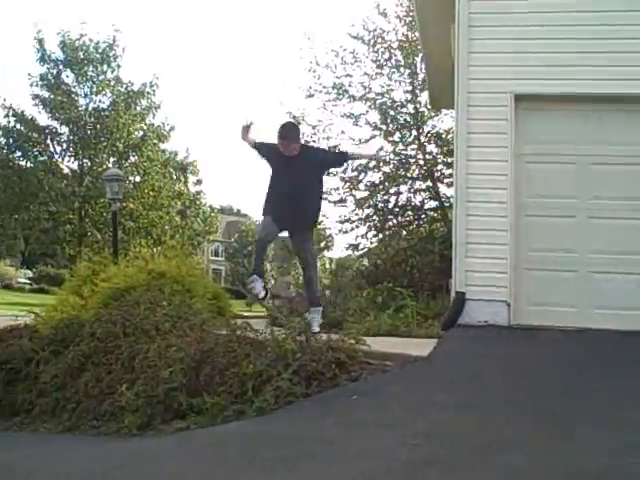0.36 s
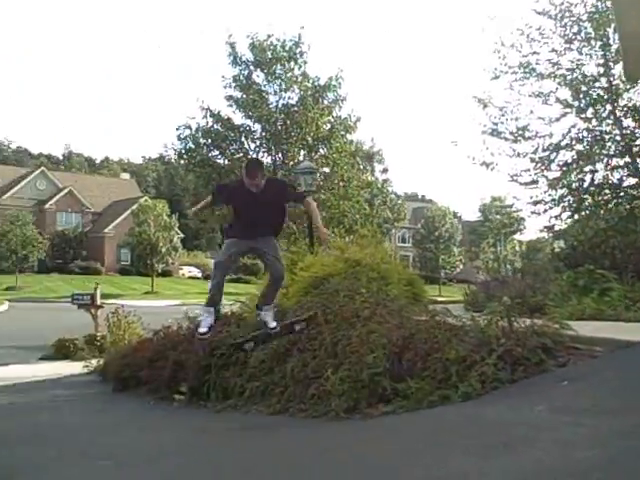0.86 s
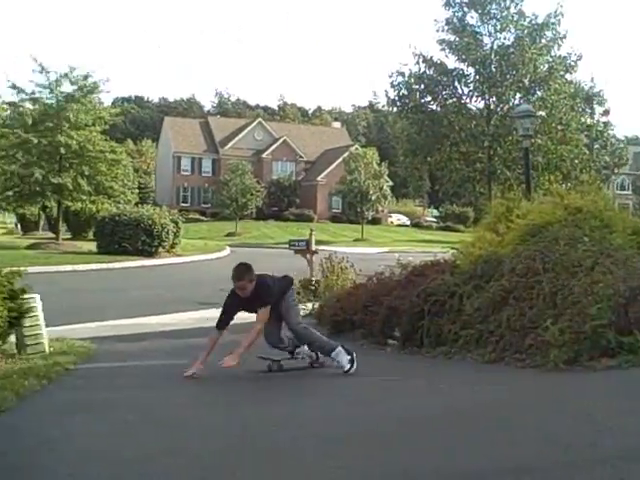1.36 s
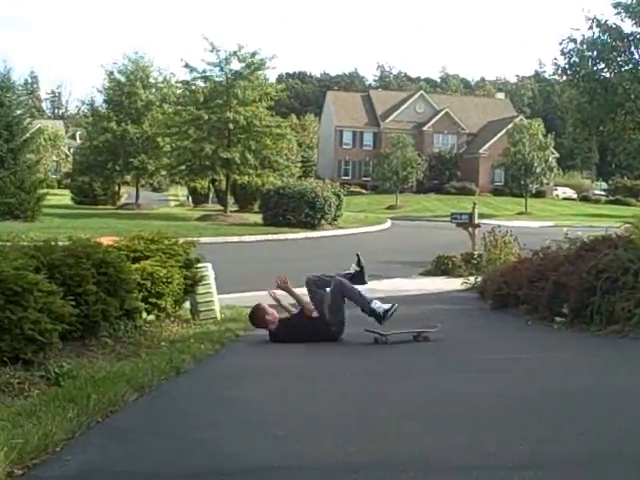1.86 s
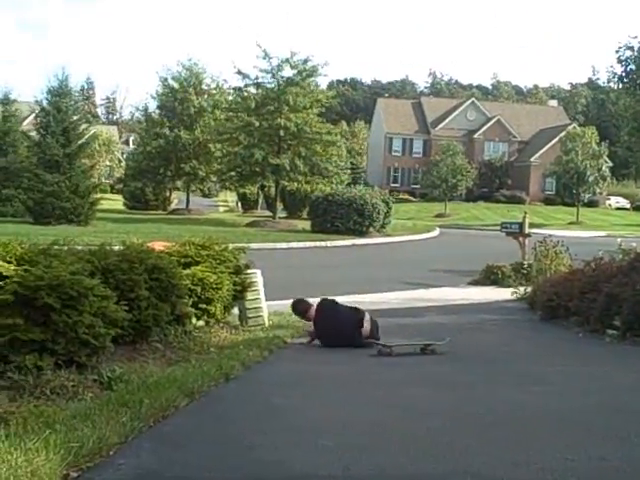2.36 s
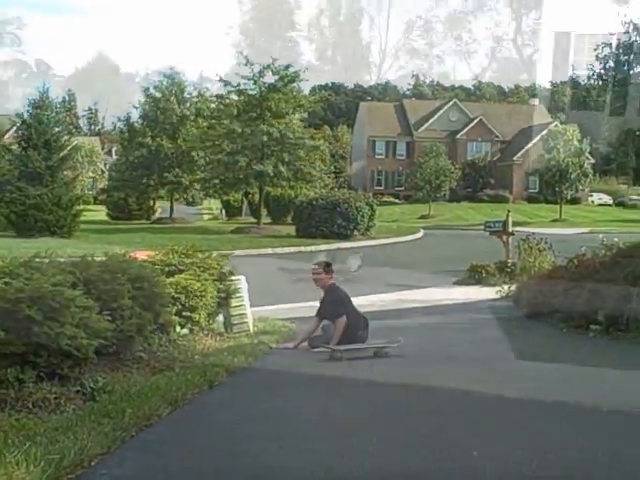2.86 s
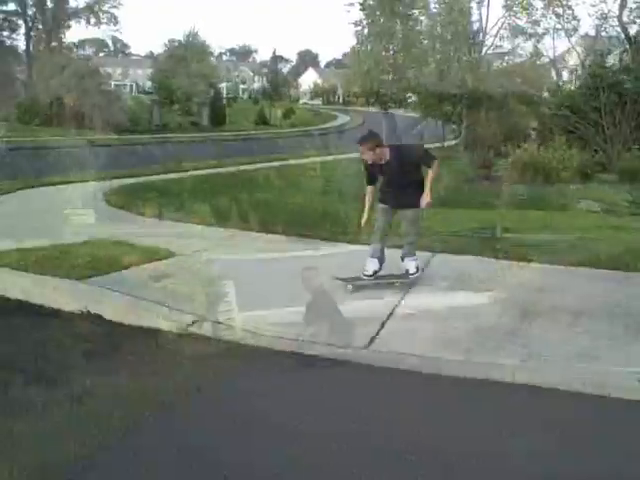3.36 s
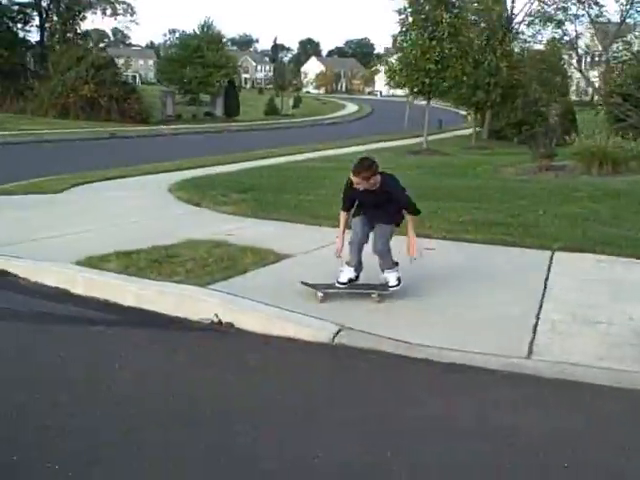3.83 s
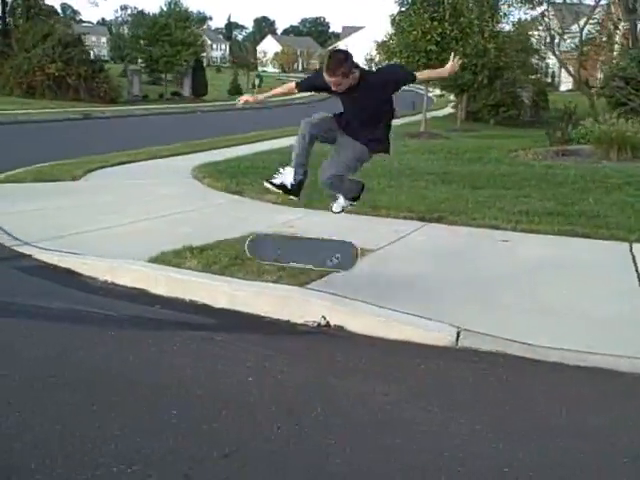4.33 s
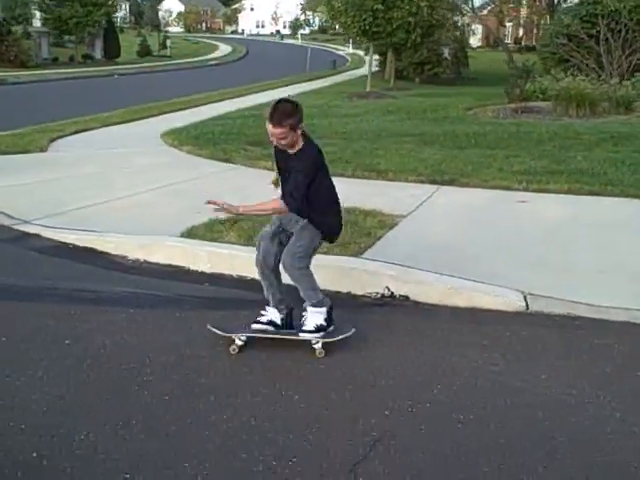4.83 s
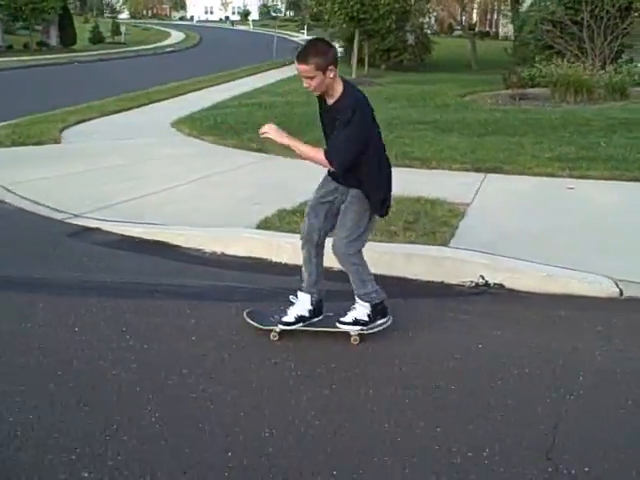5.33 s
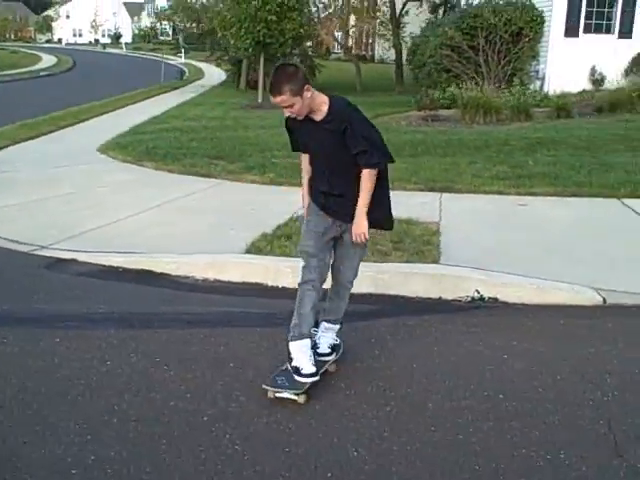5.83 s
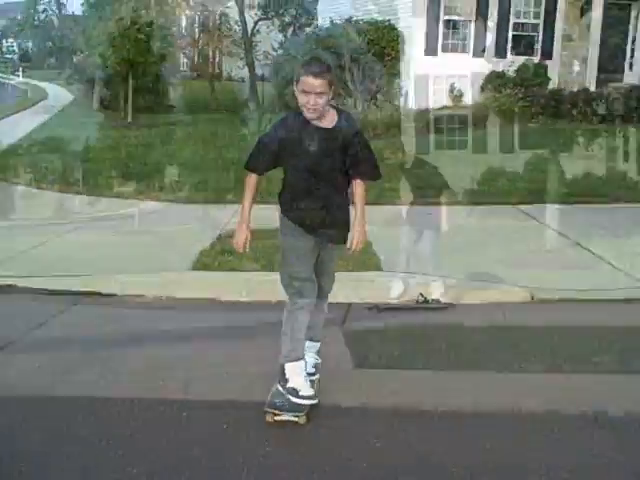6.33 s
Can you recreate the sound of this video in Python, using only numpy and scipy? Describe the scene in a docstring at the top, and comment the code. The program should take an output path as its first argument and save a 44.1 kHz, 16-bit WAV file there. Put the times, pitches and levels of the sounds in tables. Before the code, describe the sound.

A skateboard pops, slams hard onto a driveway and clatters through a tumble, then wind buffets the microphone as it pops and lands again.

```python
"""A skateboard, close by, rolls up, pops, flips and slams onto a driveway; rider and board tumble.
Each blow is a noisy crack, the ringing deck and a scrape; wheels are grit noise, with an echo off house fronts.
Behind it a suburb murmurs (shaped noise) and an engine hums far off (a wavering tone).
The place then dissolves into a windy kerb: gusts of noise buffet the microphone as the board pops, lands, rolls on.
"""
import sys
import numpy as np
from scipy import signal
from scipy.fft import rfft, irfft
from scipy.io import wavfile
from scipy.ndimage import uniform_filter1d

SR = 44100
rng = np.random.default_rng(int(sys.argv[2]) if len(sys.argv) > 2 else 0)


def convert_level_to_amplitude(level_db):
    """Map a level in decibels to its linear amplitude factor."""
    exponent = np.asarray(level_db, float) / 20
    return 10 ** exponent


def transcribe(u):
    """Save the signal u as a 16-bit wav file named by the first command-line argument.

    u: samples, shape (n,) or (channels, n), limited to [-1, 1]; the rate is SR.
    q: integer samples, one column per channel.
    """
    v = np.clip(np.atleast_2d(u).T, -1, 1)
    q = np.round(v * 32767).astype(np.int16)
    wavfile.write(sys.argv[1], SR, q)


N = 283999
TIME = np.arange(N) / SR

# far traffic rumble and hiss, spectrum: (frequency [Hz], density [dB per Hz])
SUBURB_SPECTRUM = [(12, -35), (20, -15), (75, -10.5), (101, -4), (118, -6.5), (135, -11), (147, -13),
                   (220, -10.5), (493, -40), (1610, -35), (1900, -37), (2110, -65), (2690, -41),
                   (6370, -45.5), (12500, -53), (16200, -64), (22000, -120)]
# narrow bands that sing in the background, insects perhaps, before the fade:
# (centre [Hz], width [Hz], level [dB])
SINGING_BANDS = [(2195, 270, -60), (4670, 500, -71), (6450, 280, -65)]
# leaves rustle nearby and fall still: (time [s], level [dB])
LEAF_RUSTLE = [(0.6, -54), (0.8, -49.5), (0.87, -62), (0.98, -48), (1.12, -77), (1.4, -50), (2.42, -59),
               (2.8, -66)]
# the far engine comes and goes on the air: (time [s], level [dB])
ENGINE_LEVEL = [(0.0, -31), (0.1, -42.5), (0.38, -36.5), (0.42, -56), (0.455, -30.5), (0.62, -46),
                (1.1, -50), (1.15, -55), (1.4, -75), (1.445, -40.5), (1.642, -33.5), (1.88, -35),
                (2.03, -30), (2.12, -38), (2.46, -42), (2.53, -32.5), (2.72, -39), (2.9, -38)]
# wind on the microphone, spectrum before gusts: (frequency [Hz], density [dB per Hz])
WIND_SPECTRUM = [(12, 5), (20, -3), (92, -2), (216, -9), (292, -12), (412, -17.5), (735, -22), (926, -32.5),
                 (1190, -36.5), (1400, -37.5), (1940, -52.5), (2810, -67), (3150, -79.5), (5000, -99),
                 (6500, -120), (11000, -120)]
# gusts on the microphone: (time [s], rumble level [dB], brightening [dB per kHz])
GUSTS = [(2.76, -49, 15.5), (2.83, -32.5, 9), (2.95, -18.5, 5), (3.03, -15, 4.5), (3.06, -16.5, 3),
         (3.12, -15, 5.5), (3.22, -10, 5), (3.27, -22.5, 3.5), (3.33, -13.5, -0.5), (3.6, -16, 1.5),
         (3.75, -10, -1.5), (3.82, -11, 1.5), (3.87, -19, 6.5), (3.93, -13.5, -0.5), (4.42, -17.5, 5.5),
         (4.67, -8.5, -3.5), (4.82, -2.5, -8.5), (4.92, -17, -9.5), (5.0, -14, 0.5), (5.06, -15.5, -1),
         (5.18, -25, 7), (5.5, -18, 5.5), (5.76, -18, 3), (6.05, -22, 5), (6.44, -21.5, 6)]
# deep thudding builds up once the wind has set in: (time [s], level over the gusts' share [dB])
DEEP_THUD = [(2.75, -14), (3.07, -7.5), (3.63, -4), (4.1, -1.5), (4.5, 3), (5.0, 1.5), (5.6, 3.5),
             (6.44, 0)]
# sudden puffs of wind into the port; the first row, at 0.455 s, comes before the wind lets anything through and
# stays silent: # (time [s], level before brightening [dB], rise to peak [ms], brightening [dB per kHz])
PUFFS = [(0.455, -19.5, 15, -42), (2.962, -23.5, 3.6, 10), (2.994, -32, 3, 12),
         (3.013, -20, 2.5, 9.5), (3.028, -19, 1.8, 6.5), (3.084, -16, 4.1, -4),
         (3.123, -20, 2.2, 8.5), (3.186, -9, 1.6, 9.5), (3.199, -7.5, 1.4, 7.5),
         (3.236, -11, 14.3, 9.5), (3.276, -14, 4.6, 2), (3.336, -18, 2.2, -1),
         (3.388, -23.5, 5.8, 8), (3.526, -16, 3.6, 5), (3.552, -23, 4.2, 11),
         (3.677, -30, 2.7, 10), (3.691, -18.5, 2.3, 9.5), (3.832, 0, 7.4, -17),
         (3.839, -14.5, 2.5, 10.5), (3.85, -12, 4.5, 9.5), (3.863, -8.5, 3.8, 10.5),
         (3.873, -10, 2.9, 7.5), (3.886, -7, 1.7, 5), (4.105, -14.5, 2.7, 8),
         (4.259, -13.5, 4, -6), (4.625, -10.5, 19, -1), (4.738, -15.5, 15, 6),
         (4.773, -14, 4.8, 9), (5.022, -15, 7.3, -21), (5.112, -21, 9.3, -18),
         (5.294, -11, 3.3, -28), (5.592, -35, 1.2, 6), (5.631, -32, 2.2, 11), (5.697, -26, 3, 9),
         (6.14, -4.5, 2.8, -35)]
# bending modes of the plywood deck: (frequency [Hz], relative level [dB], t60 [s])
DECK_MODES = [(205, 26, 0.12), (292.6, 31.5, 0.042), (362, 20, 0.086), (437, 5, 0.047), (590, 6.5, 0.07),
              (655, 6.5, 0.079), (745, 1.5, 0.1), (1100, -2.5, 0.05), (1215, -18, 0.038), (1373, -6, 0.059),
              (1640, -4, 0.044), (1770, -3.5, 0.06), (2140, 0, 0.053), (2520, -16, 0.04), (3030, -1, 0.046),
              (3390, -11.5, 0.047), (4590, 3, 0.037)]
# hiss spectrum: (frequency [Hz], density [dB per Hz])
HISS_SPECTRUM = [(1760, -42), (3000, 3), (3520, -16), (5290, 7.5), (5790, -2), (6440, -39), (8180, 2.5),
                 (11000, -1.5), (12500, -6), (16200, -16), (22000, -120)]
# hiss of wheels and, from 2.2 to 2.7 s, of the background, before flicker: (time [s], level [dB])
HISS_LEVEL = [(0.0, -62.5), (0.47, -56), (0.67, -62.5), (0.9, -73), (1.17, -83), (1.2, -41.5), (1.35, -61),
              (1.52, -56.5), (1.71, -59), (2.2, -59), (2.7, -65.5), (3.3, -65), (3.96, -58), (4.29, -58.5),
              (4.51, -63), (4.97, -58.5), (5.3, -63), (5.68, -58.5), (6.0, -69), (6.44, -69)]
# the deck rumbles over the hiss, most under the rider's weight: (time [s], level over hiss [dB])
DECK_RUMBLE = [(0.0, 29.5), (0.3, 22), (0.8, 15.5), (1.4, 11), (2.4, 6), (3.2, 17.5), (6.44, 23.5)]
# crack of a blow, spectrum: (frequency [Hz], density [dB per Hz])
CRACK_SPECTRUM = [(350, -5), (600, -1.5), (2620, -4), (3050, -6.5), (3550, -8.5), (9100, -16.5),
                  (12500, -19.5), (16200, -61), (22000, -120)]
# clean blows on the deck: (time [s], crack level [dB], peak of deck ring over crack level [dB],
# pitch most rung [Hz], contact length [ms])
DECK_KNOCKS = [(0.2766, -46.5, 29, 198, 4.2), (0.4525, -34.5, 21, 890, 1.9), (1.1692, -8.5, 9.5, 615, 9),
               (1.175, -18.5, 14, 313, 4.8), (1.176, -17, 7, 645, 4.3), (1.216, -16, 8, 1520, 2.3),
               (1.2221, -11, 11.5, 646, 7.3), (1.23, -11, 12, 1190, 1.4), (1.2313, -19, 7, 2140, 6.2),
               (1.2008, -28, 10, 330, 4.6), (1.4138, -34.5, 9, 690, 10), (1.4536, -19.5, 0, 1950, 3.3),
               (1.457, -22.5, -8, 1960, 5.2), (1.597, -36, -3, 1373, 3.4), (1.6336, -15.5, -1, 2900, 3.6),
               (1.6413, -15, -1, 1230, 1.6), (1.664, -29, 11, 1040, 6.2), (1.6728, -31.5, 10, 375, 10.5),
               (1.679, -32, 8, 1860, 5.5), (1.701, -41, 3, 1900, 3), (1.774, -40, 6, 1780, 14),
               (1.8884, -20.5, 4, 407, 4.4), (1.9635, -29.5, 14, 745, 5.9), (2.024, -29.5, -9, 2180, 2.7),
               (2.069, -33, -1, 2230, 7.2), (2.314, -51, 10, 1050, 2.3), (2.345, -45, 10, 1640, 1.4),
               (2.619, -49.5, 21.5, 470, 6.3), (2.628, -57, 0, 3390, 3), (2.678, -39, -3, 2200, 6.2),
               (3.089, -39, 9.5, 1920, 4.5), (4.3669, -22.5, 7.5, 3390, 7.8), (4.367, -28, 12, 1480, 12),
               (4.368, -32, 4, 4590, 3.2), (4.8303, -11, 16, 670, 6.1), (4.838, -20, 10, 1670, 5),
               (4.845, -10, 2.5, 2000, 4.9), (4.8658, -18.5, 11, 553, 4), (4.9195, -18.5, 5.5, 690, 4.5),
               (4.983, -53, 9, 687, 1.6), (5.825, -22.5, 0, 1780, 7)]
# short blows of board and wheels, some with a scrape: (time [s], crack level [dB],
# peak of deck ring over crack level [dB], pitch most rung [Hz], scrape over crack [dB])
SHORT_BLOWS = [(0.0508, -35, 11, 590, 0), (0.1535, -31, 13, 590, -1), (0.4177, -37, 7.5, 810, 0),
               (0.575, -37.5, 9, 1810, -0.5), (0.5835, -25.5, -3, 736, -2.5), (1.025, -43.5, 21, 336, 0),
               (1.0547, -39.5, 4, 744, -11), (1.2303, -25, 0, 700, -31), (1.25, -31.5, 3, 1230, 2),
               (1.3502, -28.5, 0.5, 307, -6.5), (1.611, -36.5, -4, 3450, 4), (1.645, -29, 2, 703, -0.5),
               (1.897, -32.5, 4, 1220, 4), (1.944, -37, -8, 960, -2), (1.968, -42.5, 15, 745, 5.5),
               (4.35, -47, -4, 3000, 11), (4.386, -37, -14, 2000, 4), (4.8535, -13, 13, 610, -15),
               (5.02, -35.5, -26, 2000, 0.5), (5.471, -35.5, -13, 2180, 1.5)]
# wheels and shoes tick on grit and cracks: (time [s], crack level [dB], contact length [ms])
GRIT_TICKS = [(0.03, -31, 2.5), (0.5326, -25.5, 5.5), (0.657, -36, 6.6), (1.5396, -36.5, 2.8),
              (1.5809, -22.5, 6.1), (2.2924, -37, 3), (2.337, -22, 1.6), (3.487, -24, 5.9),
              (3.499, -24.5, 5), (4.9365, -20, 3.7), (5.167, -29.5, 1.7), (5.243, -36, 1.8),
              (5.2685, -30.5, 2), (5.45, -27, 1.1), (5.589, -24.5, 6.1), (5.9259, -21.5, 1.5),
              (6.047, -40, 2.5), (6.085, -46, 2.5), (6.125, -37, 2.5), (6.193, -37, 1.9), (6.217, -37, 2.8),
              (6.328, -34, 5.8)]

FADE_S = (2.75, 3.5)  # the first place dissolves into the second


def level(x, db):
    """Scale to an rms level."""
    return x * convert_level_to_amplitude(db) / np.sqrt(np.mean(x ** 2))


def colour(x, points):
    """Shape a spectrum by (frequency [Hz], gain [dB]) points, joined on a log frequency axis."""
    hz, db = np.transpose(points)
    f = np.arange(len(x) // 2 + 1) * SR / len(x)
    return irfft(rfft(x) * convert_level_to_amplitude(np.interp(np.log(f + 1), np.log(hz), db)), len(x))


def band(x, hz, width_hz):
    """Band-pass around hz."""
    edges = [hz - width_hz / 2, min(hz + width_hz / 2, SR * .45)]
    return signal.sosfilt(signal.butter(2, edges, "band", fs=SR, output="sos"), x)


def walk(rate):
    """Random levels held 1 / rate s and slewed twice; spread near 1."""
    hold = int(SR / rate)
    steps = np.repeat(rng.standard_normal(N // hold + 1), hold)
    return 1.3 * uniform_filter1d(uniform_filter1d(steps, hold), hold)[:N]


def curve(table, column, silent_db=-100.):
    """A table column over time; outside the table it takes the value silent_db."""
    rows = np.array(table)
    return np.interp(TIME, rows[:, 0], rows[:, column], left=silent_db, right=silent_db)


def suburb():
    """Far traffic as shaped noise, flickering narrow bands and band-passed leaf noise nearby."""
    fade = np.interp(TIME, FADE_S, convert_level_to_amplitude([0, -6]))
    murmur = level(colour(rng.standard_normal(N), SUBURB_SPECTRUM), -40) * convert_level_to_amplitude(0.5 * walk(8.3))
    for hz, width_hz, db in SINGING_BANDS:
        singing = level(band(rng.standard_normal(N), hz, width_hz), db)
        flicker = convert_level_to_amplitude(2.2 * walk(20) + .5 * walk(2.55))
        murmur = murmur + singing * flicker * fade
    leaves = level(band(rng.standard_normal(N), 1470, 1700), 0)
    leaves = leaves * convert_level_to_amplitude(curve(LEAF_RUSTLE, 1) + 2 * walk(40))
    # the singing bands fade twice over, the leaves not at all
    return leaves + murmur * fade


def engine():
    """A far engine idles, then speeds up evenly: a wavering low tone with a weak octave."""
    idle_hz, speeds_up_s, climb_hz_per_s = 105.1, 1.5, 14
    hz = idle_hz + climb_hz_per_s * np.maximum(TIME - speeds_up_s, 0)
    phase = 2 * np.pi * np.cumsum(hz * (1 + 0.0067 * walk(40.75))) / SR
    gain = uniform_filter1d(convert_level_to_amplitude(curve(ENGINE_LEVEL, 1)), size=800)
    return np.sqrt(2) * gain * (np.sin(phase) + convert_level_to_amplitude(-15.5) * np.sin(2 * phase))


def wind():
    """Eddies on the microphone port: noise slices with own gains, treble in short spikes."""
    steady_gust_db, deep_follows = -18, 0.35
    air = rfft(level(colour(rng.standard_normal(N), WIND_SPECTRUM), 0))
    octave = np.log2(np.arange(len(air)) * SR / N + 1)
    spikes_db = 1.53 * walk(140)
    gust_db, tilt_db = curve(GUSTS, 1), curve(GUSTS, 2, silent_db=-2)
    gust = convert_level_to_amplitude(gust_db + 1.03 * walk(24.243))
    # the deep thudding swells less than the gusts
    over_db = np.maximum(gust_db - steady_gust_db, -10)
    deep_db = curve(DEEP_THUD, 1) - (1 - deep_follows) * over_db + 2.0 * walk(21.91)
    out = 0
    for hz in 14 * 2 ** np.arange(0, 9.5, .75):
        # brightening grows in step with frequency up to 4.5 kHz
        reach = min(hz, 4500) / 1000
        # share of deep thudding: whole below 80 Hz, none above 160 Hz
        deep = np.clip(np.log2(160 / hz), 0, 1)
        gain = gust * convert_level_to_amplitude(spikes_db * min(hz / 500, 1) + walk(30) + tilt_db * reach + deep_db * deep)
        for s, db, ms, push_tilt_db in PUFFS:
            t = np.arange(SR // 10) / SR / (ms / 1000)  # in rise times
            start = int(s * SR)
            push = convert_level_to_amplitude(db + push_tilt_db * reach) * t * np.exp(1 - t)
            gain[start:start + len(t)] += (1 - 0.17 * deep) * push
        # overlapping slices that add up to the whole spectrum
        slice_ = np.clip(1 - np.abs(octave - np.log2(hz)) / .75, 0, 1)
        out = out + gain * irfft(air * slice_, N)
    # clipped flat under a ceiling that rises from nothing over one second;
    # before it rises nothing passes
    ceiling = np.interp(TIME, (2.73, 3.73), [0, 1])
    return np.clip(out, -ceiling, ceiling)


def deck(push, spread_db, near_hz, reach_octaves, struck=False):
    """The deck rings as a bank of resonators; modes around one pitch are favoured, the nearest most."""
    out = 0
    for hz, db, t60 in DECK_MODES:
        r = np.exp(-np.log(1000) / (t60 * SR))
        pole = [1, -2 * r * np.cos(2 * np.pi * hz / SR), r * r]
        octaves_off = np.log2(hz / near_hz)
        share = np.exp(-(octaves_off / reach_octaves) ** 2)
        share *= 1 + 4 * np.exp(-(octaves_off / .15) ** 2)
        mode = signal.lfilter([1, 0, -1], pole, push)
        # a blow sets every mode swinging to its own height; rolling lets long rings build up
        mode = mode / np.abs(mode).max() if struck else mode
        out = out + share * convert_level_to_amplitude(db + spread_db * rng.standard_normal()) * mode
    return out


def wheels_and_hiss():
    """Grit as dense clicks of uneven size: wheel (from 2.2 to 2.7 s background) hiss and deck rumble."""
    sizes = convert_level_to_amplitude(np.minimum(4 * rng.exponential(size=N), 14))
    clicks = rng.random(N) < 1200 / SR  # about 1200 a second
    grit = rng.standard_normal(N) * (1 + clicks * sizes)
    hiss = level(colour(grit, HISS_SPECTRUM), 0)
    rumble = level(deck(grit, spread_db=0., near_hz=590, reach_octaves=2.2), 0)
    # the tread grinds in the middle range and flickers with the hiss; the deck rumbles steadily
    grind = level(band(grit, 1040, 1790), -17.5)
    flicker, load = convert_level_to_amplitude(4.6 * walk(70)), convert_level_to_amplitude(curve(DECK_RUMBLE, 1))
    gain = uniform_filter1d(convert_level_to_amplitude(curve(HISS_LEVEL, 1)), size=3000)
    return gain * (flicker * (hiss + load * grind) + load * rumble)


def blow(s, crack_db, ring_db, near_hz, ms, scrape_db, rings_on_db=0):
    """A rattling contact: a crack, the ring of the deck and a gritty scrape that dulls as it slows."""
    scrape_s, scrape_ring_db, scrape_dulls_hz = 0.036, -9, 2480
    t, length = np.arange(SR // 7) / SR, max(ms, .5) / 1000
    # the longer the contact, the softer its rise
    rise = 1 - np.exp(-t / (0.56 * length))
    # the force jumps every 1.5 ms
    jumps = np.repeat(rng.standard_normal(len(t) // 66 + 1), 66)[:len(t)]
    contact = rise * np.exp(-(t / length) ** 2) * convert_level_to_amplitude(2.5 * jumps)
    slowing = np.exp(-t / scrape_s)
    drag = rise * convert_level_to_amplitude(scrape_db + 2.26 * jumps) * slowing
    chance = rng.standard_normal((2, len(t)))
    grit = level(colour(chance[0], CRACK_SPECTRUM), 0)
    # weak blows are dull: low-pass at 3.5 times the pitch for a -50 dB crack, doubling every 5 dB
    top_hz = min(3.5 * near_hz * 2 ** ((crack_db + 50) / 5), .45 * SR)
    grit = signal.lfilter(*signal.butter(2, top_hz, fs=SR), grit)
    dull = signal.lfilter(*signal.butter(2, scrape_dulls_hz, fs=SR), grit)
    crack = grit * contact + (slowing * grit + (1 - slowing) * dull) * drag
    push = chance[1] * (contact + convert_level_to_amplitude(scrape_ring_db) * drag)
    ring = deck(push, spread_db=1.5, near_hz=near_hz, reach_octaves=.7, struck=True)
    # after 1.6 contact lengths the ring falls to rings_on_db
    held = np.exp(-(t / (1.6 * length)) ** 4)
    ring = ring * (held + (1 - held) * convert_level_to_amplitude(rings_on_db))
    out, start = np.zeros(N + SR), int(s * SR)
    out[start:start + len(t)] = convert_level_to_amplitude(crack_db) * (crack + convert_level_to_amplitude(ring_db) * ring / np.abs(ring).max())
    return out[:N]


def hits():
    """Knocks choke as the deck is pressed to the ground, short blows ring free, ticks hardly ring the deck."""
    knocks = sum(blow(*row, scrape_db=-16, rings_on_db=-18) for row in DECK_KNOCKS)
    short_blows = sum(blow(s, db, ring_db, hz, 2.44, scrape_db)  # contact 2.44 ms
                      for s, db, ring_db, hz, scrape_db in SHORT_BLOWS)
    ticks = sum(blow(s, db, ring_db=-17, near_hz=2300, ms=ms, scrape_db=-29) for s, db, ms in GRIT_TICKS)
    return knocks + short_blows + ticks


def house_fronts(board):
    """A short echo off house fronts: convolution with decaying noise that starts after 12 ms."""
    t60_s, echo_db = 0.41, -24
    t = np.arange(SR // 3) / SR
    fronts = rng.standard_normal(len(t)) * np.exp(-np.log(1000) * t / t60_s) * (t > .012)
    return signal.fftconvolve(board, convert_level_to_amplitude(echo_db) * fronts / np.sqrt(np.sum(fronts ** 2)))[:N]


def scene():
    """The board close by and its echo, over wind on the microphone, the far engine and the suburb."""
    board = hits() + wheels_and_hiss()
    return (board + house_fronts(board) + wind() + engine() + suburb())[None]


def low_pass(x):
    """Removes everything above the highest recorded frequency."""
    return signal.sosfilt(signal.butter(12, 12720, fs=SR, output="sos"), x)


def record(dry):
    """The camera cuts the top above 12.6 kHz and clips what overloads it flat."""
    cut = signal.sosfilt(signal.ellip(10, .2, 45, 12600, fs=SR, output="sos"), dry)
    return low_pass(np.clip(cut, -1, 1))


dry = scene()
out = record(dry)
transcribe(out)
```